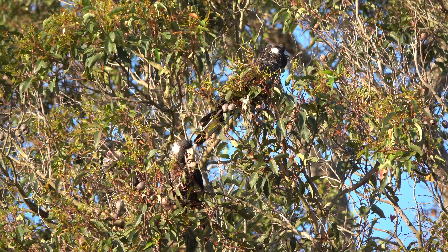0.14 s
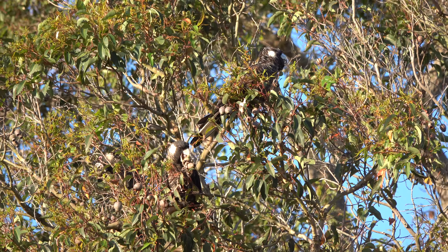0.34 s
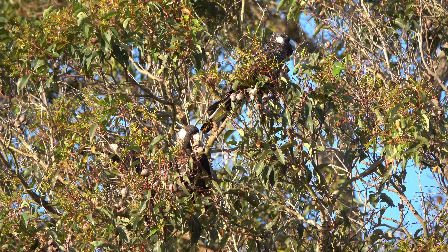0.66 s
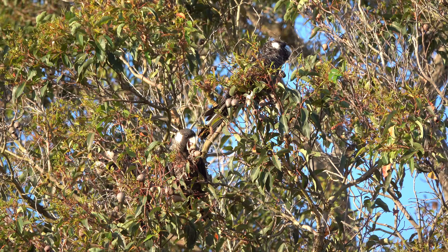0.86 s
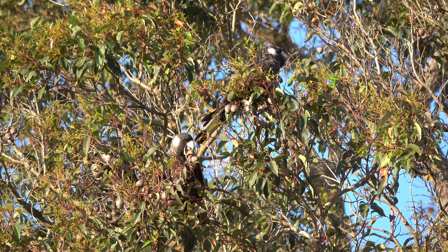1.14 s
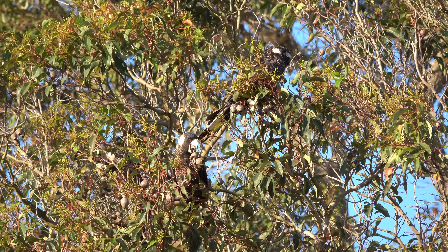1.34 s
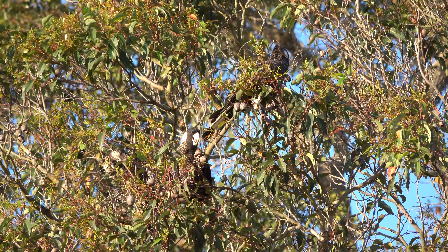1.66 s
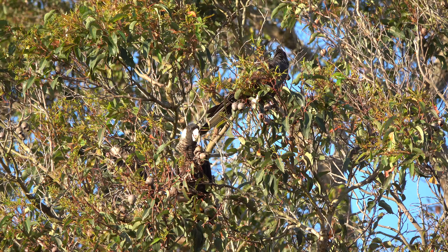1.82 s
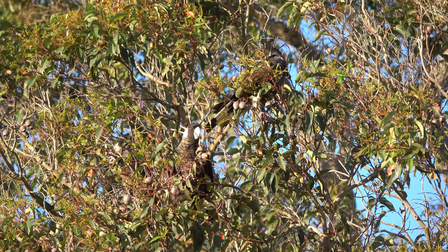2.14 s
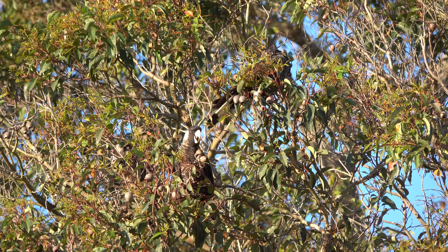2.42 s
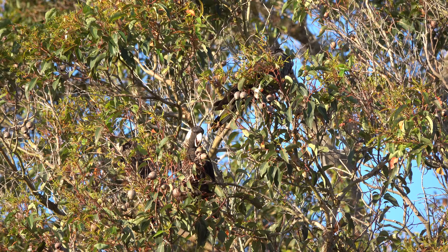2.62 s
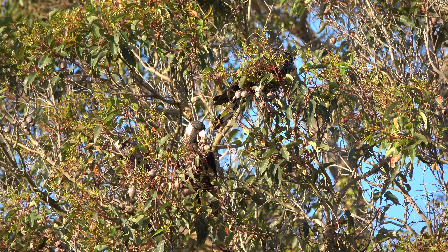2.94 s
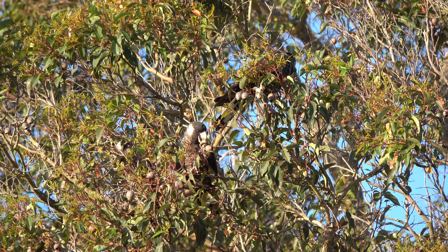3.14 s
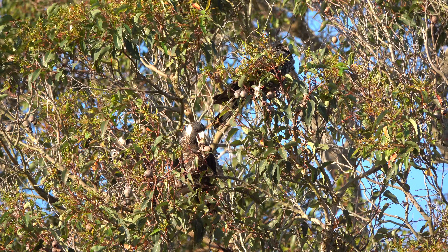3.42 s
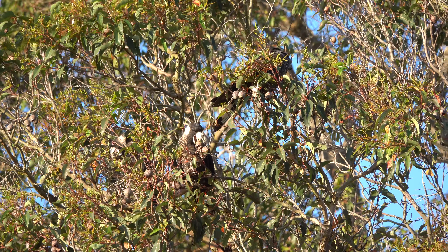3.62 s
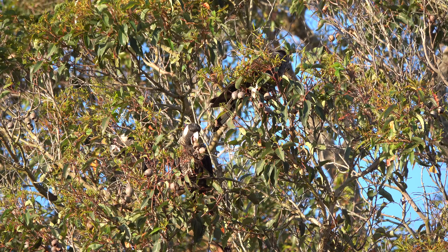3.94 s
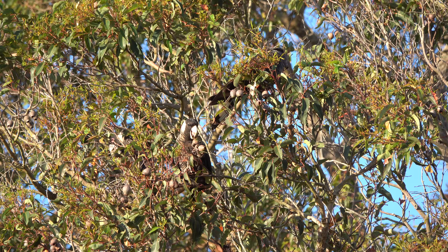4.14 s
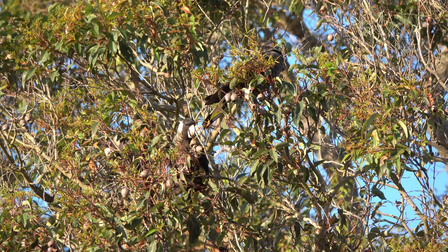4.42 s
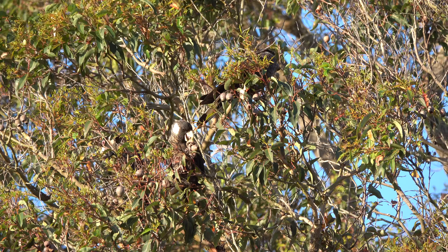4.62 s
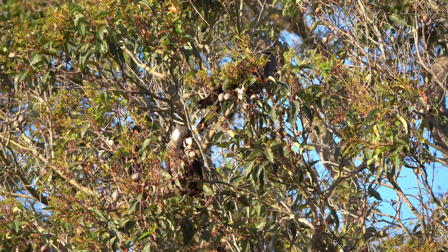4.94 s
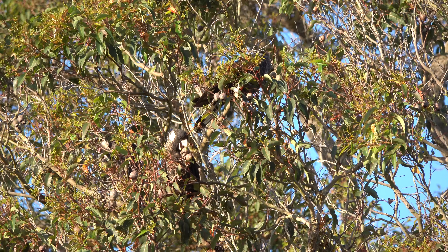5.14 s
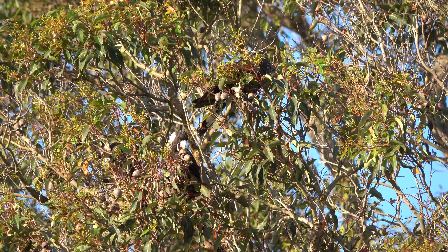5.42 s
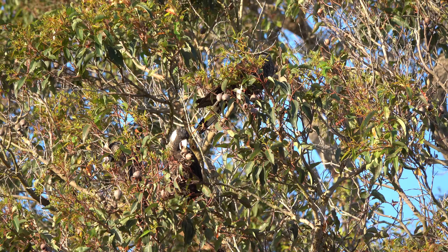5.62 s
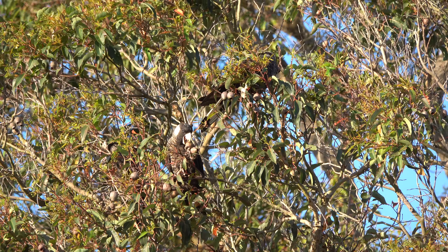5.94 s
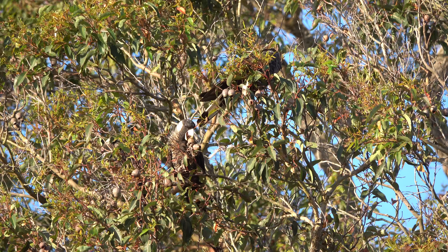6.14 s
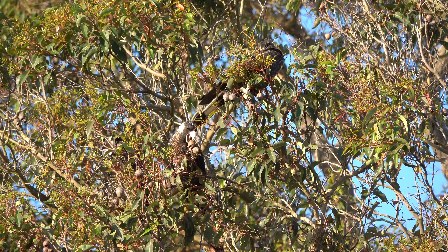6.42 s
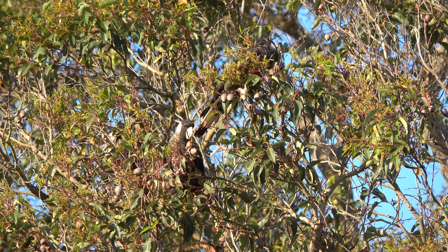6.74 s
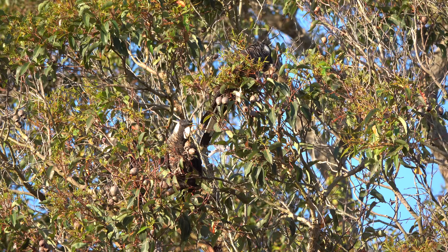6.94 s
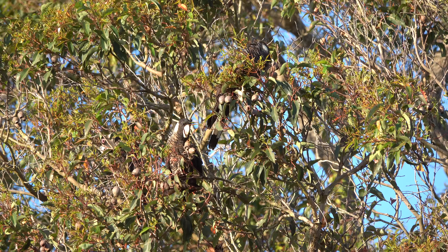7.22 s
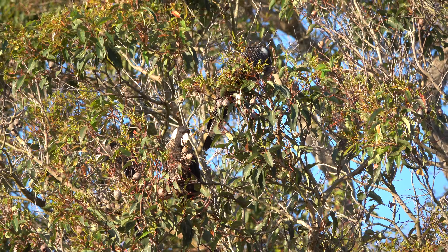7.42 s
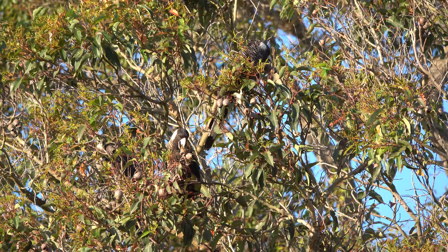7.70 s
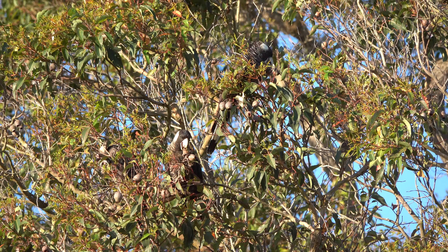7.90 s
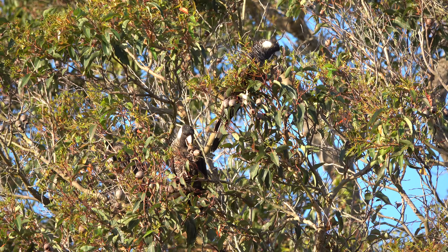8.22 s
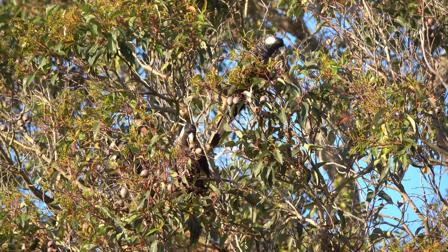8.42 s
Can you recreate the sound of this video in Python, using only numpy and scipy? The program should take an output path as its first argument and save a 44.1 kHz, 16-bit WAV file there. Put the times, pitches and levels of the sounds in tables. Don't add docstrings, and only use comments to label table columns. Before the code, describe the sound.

Short clusters of squealing, wailing cockatoo calls ring through open trees, separated by quiet gaps of faint hiss and low traffic wash.

```python
import sys
import numpy as np
from scipy import signal
from scipy.io import wavfile

SR = 44100
rng = np.random.default_rng(int(sys.argv[2]) if len(sys.argv) > 2 else 0)


def ratio_of_db(decibels):
    return 10 ** (np.asarray(decibels, float) / 20)


def unload_wav(signal):
    wavfile.write(
        sys.argv[1],
        SR,
        np.round(np.clip(np.atleast_2d(signal).T, -1, 1) * 32767).astype(np.int16),
    )


N = 377937


def rms_one(x):
    return x / np.sqrt(np.mean(x ** 2) + 1e-20)


def at_hz(points, hz):
    table_hz, value = np.array(points).T
    return np.interp(np.log(hz), np.log(table_hz), value)


def drift(rate_hz, size):
    knots = rng.standard_normal(int(size * rate_hz / SR * 2) + 3)
    return np.interp(np.arange(size) * rate_hz * 2 / SR, np.arange(len(knots)), knots) * 1.57


def pan(x, left_right_db):
    return np.array([x * ratio_of_db(left_right_db / 2), x * ratio_of_db(-left_right_db / 2)])


def voice(notes, partials_db, waver, shimmer_db, edge_s):
    # (frequency [Hz], level [dB])
    throat_colour = [(5800, 7.5), (7200, 1.5), (9200, 1.5), (11000, 1), (13500, -12), (16000, -5)]
    out = np.zeros(N)
    for note in notes:
        s, hz, level_db, *second_db = np.transpose(note)
        i = np.arange(int(s[0] * SR), min(int(s[-1] * SR), N))
        t = i / SR
        pitch_hz = np.interp(t, s, hz)
        phase = np.cumsum(pitch_hz * (1 + waver * drift(162.3, len(i)))) * 2 * np.pi / SR
        first = np.interp(t, s, level_db)
        if second_db:
            second = np.interp(t, s, second_db[0])
            levels = [first, second] + [second + db for db in partials_db]
        else:
            levels = [first + db for db in partials_db]
        edge = np.clip(np.minimum(t - s[0], s[-1] - t) / edge_s, 0, 1)
        for k, level in enumerate(levels, 1):
            if k > 1 + len(second_db):
                level = level + at_hz(throat_colour, k * pitch_hz)
            if k * hz.max() < 0.45 * SR:
                gain = ratio_of_db(level + shimmer_db * drift(50, len(i)))
                out[i] += np.sqrt(2) * edge * gain * np.sin(k * phase)
    return out


def glides(rows, attack, swell_db, release, fade_db, second_db=None, fall_bend=1.4):
    age = np.linspace(0, 1, num=12)
    swell = -swell_db * np.clip(1 - age / attack, 0, 1)
    fade = -fade_db * np.clip(1 - (1 - age) / release, 0, 1)
    notes = []
    for s, length_s, start_hz, end_hz, level_db in rows:
        bend = 0.65 if end_hz > start_hz else fall_bend
        hz = start_hz + (end_hz - start_hz) * age ** bend
        columns = [s + length_s * age, hz, level_db + (swell + fade)]
        if second_db is not None:
            columns.append(columns[2] + second_db)
        notes.append(np.transpose(columns))
    return notes


def wails():
    # (time [s], pitch [Hz])
    held_pitch = [
        [(1.085, 2560), (1.12, 2670), (1.17, 2725), (1.195, 2770), (1.24, 2772), (1.27, 2755), (1.3, 2705),
         (1.36, 2605), (1.392, 2520)],
        [(2.856, 2890), (2.873, 2850), (2.899, 2745), (2.925, 2695), (2.951, 2655), (2.977, 2520),
         (2.992, 2450)],
        [(3.688, 3090), (3.698, 3010), (3.705, 2950), (3.722, 2902), (3.758, 2880), (3.77, 2830), (3.802, 2680),
         (3.834, 2505), (3.849, 2430)],
    ]
    # (level [dB], second partial [dB])
    effort = [
        [(-57.5, -59), (-43, -43), (-37.5, -40.5), (-27.5, -44), (-32, -64), (-33.5, -39.5), (-37, -39.5),
         (-34.5, -40.5), (-32, -52)],
        [(-37, -50), (-32, -50.5), (-27, -42), (-33, -39.5), (-29, -36), (-30, -42), (-28, -43)],
        [(-34, -33), (-33, -38.5), (-24, -34), (-27.5, -29.5), (-25.5, -39.5), (-26, -44), (-29.5, -39),
         (-28, -45.5), (-30, -47)],
    ]
    # (time [s], length [s], start [Hz], end [Hz], level [dB])
    far_wails = [
        (7.385, 0.08, 2260, 2298, -46.5),
        (8.173, 0.05, 2730, 2444, -55),
        (8.506, 0.0623, 2997, 2905, -45),
    ]
    upper_db = [-18.5, -19.5, -17, -27.5]
    notes = [np.hstack([pitch, push]) for pitch, push in zip(held_pitch, effort)]
    notes += glides(far_wails, 0.22, 5.3, 0.55, 4, second_db=-16.5)
    return pan(voice(notes, upper_db, waver=0.0011, shimmer_db=2.5, edge_s=0.00095), -0.74)


def wail_drops():
    # (time [s], length [s], start [Hz], end [Hz], level [dB])
    drops = [
        (1.393, 0.072, 1970, 1798, -39),
        (2.993, 0.036, 2080, 1883, -29.5),
        (3.851, 0.03, 2120, 1890, -28.5),
    ]
    upper_db = [-10.5, -20, -21.5, -28]
    notes = glides(drops, 0.14, 2.2, 0.92, 4.4, second_db=-5, fall_bend=0.86)
    return pan(voice(notes, upper_db, waver=0.0037, shimmer_db=3.5, edge_s=0.00092), -0.8)


def lead_ins():
    # (time [s], length [s], start [Hz], end [Hz], level [dB])
    leads = [
        (2.785, 0.071, 3867, 3235, -31.5),
        (8.447, 0.0584, 4230, 3850, -45.5),
    ]
    upper_db = [-5, -14]
    notes = glides(leads, 0.32, 9.5, 0.54, 1.9, second_db=-28.5, fall_bend=1.1)
    return pan(voice(notes, upper_db, waver=0.0018, shimmer_db=2.5, edge_s=0.0026), -1.2)


def grunts():
    open_rows = [
        (7.075, 0.058, 799, 765, -73.5),
        (7.5, 0.057, 888, 797, -62),
        (7.63, 0.098, 807, 748, -74.5),
        (8.185, 0.025, 650, 604, -77),
    ]
    open_db = [13, 10.5, 6, 1, -4.5, -4.5, -17, -24, -39, -35]
    nasal_rows = [
        (0.0, 0.1, 753.5, 711, -61.5),
        (7.436, 0.054, 850, 803, -66),
    ]
    nasal_db = [-14, 9, 10, -8, 2, 3, -3, -6, -12, -18, -20, -20, -12]
    pinched_rows = [
        (6.543, .018, 764, 770, -60),
        (8.188, 0.026, 642, 632, -68.5),
    ]
    pinched_db = [-18, -7, -1.5, 7.5, -3, -1, 3, 1, -12, -19]
    pinched = glides(pinched_rows, 0.22, 3.0, 0.61, 9.3)
    out = pan(voice(pinched, pinched_db, waver=0.003, shimmer_db=-1.0, edge_s=0.0018), -0.91)
    opened = glides(open_rows, 0.38, 7.5, 0.74, 7.2)
    out += pan(voice(opened, open_db, waver=0.011, shimmer_db=3.5, edge_s=0.0019), 0.058)
    nasal = glides(nasal_rows, 0.1, 0.3, 1.0, 11.0)
    out += pan(voice(nasal, nasal_db, waver=0.0025, shimmer_db=2.5, edge_s=0.00071), -1.0)
    return out


def warble():
    # (time [s], pitch [Hz], level [dB])
    zigzags = [
        [(.805, 4450, -57), (.83, 4590, -42), (.842, 4320, -46), (.848, 3645, -36.5), (.882, 3900, -43.5)],
        [(.888, 4570, -35.5), (.908, 4564, -46), (.917, 4190, -36), (.925, 4690, -34.5), (.937, 3720, -39)],
        [(6.42, 3990, -46), (6.433, 3990, -40), (6.44, 4570, -44), (6.447, 4010, -46), (6.455, 4200, -30)],
        [(6.455, 4070, -40), (6.463, 4980, -36), (6.472, 4130, -34), (6.495, 4520, -35), (6.503, 5150, -47),
         (6.515, 5090, -35.5), (6.532, 4900, -38.5), (6.543, 4060, -24.5)],
    ]
    partials_db = [0, -25]
    return pan(voice(zigzags, partials_db, waver=0.004, shimmer_db=3.0, edge_s=0.004), -7)


def small_parrots():
    twitter_rows = [ (.13, 0.035, 4720, 4750, -51.5), (.17, 0.027, 4400, 4100, -49),
                    (.28, 0.059, 4200, 4080, -46), (.325, 0.072, 4860, 4440, -51.5),
                    (.5, 0.028, 5520, 4350, -53), (.2, .03, 4800, 4140, -66),
                    (.245, 0.011, 5500, 5360, -65), (.375, 0.05, 4630, 4300, -49),
                    (2.55, .04, 4150, 4130, -65), (2.642, 0.036, 4150, 4250, -41),
                    (2.685, 0.014, 4250, 4170, -52), (2.712, 0.032, 4230, 4230, -57),
                    (3.08, 0.034, 5210, 5230, -46.5), (3.113, 0.02, 4210, 4090, -40),
                    (4.86, 0.06, 5280, 5160, -76), (5.65, 0.077, 3860, 4050, -61.5),
                    (5.745, 0.036, 4180, 4120, -52), (5.84, 0.103, 3920, 4040, -57),
                    (5.903, 0.091, 4600, 4550, -53), (6.115, 0.07, 4760, 4750, -54),
                    (6.165, 0.017, 4840, 4745, -44), (6.185, 0.052, 4650, 4700, -57),
                    (6.25, 0.062, 4870, 4600, -65), (6.35, 0.09, 3930, 4190, -49),
                    (6.415, 0.045, 4650, 4776, -47), (7.895, 0.033, 4220, 3940, -67.5), ]
    twitter_db = [0, -30]
    halved_rows = [
        (.89, 0.013, 2250, 2300, -59),
    ]
    halved_db = [0, -18.5, 2.4]
    twitter = glides(twitter_rows, 0.59, 3.2, 0.24, 2.8, fall_bend=0.86)
    out = pan(voice(twitter, twitter_db, waver=0.0089, shimmer_db=4.5, edge_s=0.0016), -8.5)
    halved = glides(halved_rows, 0.2, 3.0, 0.4, 3.3)
    out += pan(voice(halved, halved_db, waver=0.0045, shimmer_db=8.0, edge_s=0.0033), -10)
    return out


def squeals():
    # (time [s], length [s], start [Hz], end [Hz], level [dB])
    rows = [ (.13, 0.056, 3080, 3440, -53), (.21, 0.23, 3240, 3425, -49), (.195, 0.012, 3100, 2800, -54),
            (.443, 0.032, 3013, 2740, -49), (.51, .035, 1850, 1840, -60), (.27, 0.016, 1920, 1740, -57),
            (.933, .011, 2950, 2930, -45), (1.65, 0.42, 3640, 3674, -74), (2.26, .03, 2550, 2930, -77),
            (5.76, 0.043, 3300, 3050, -66), (5.975, 0.035, 3360, 3280, -64), (6.455, .04, 3220, 3340, -64),
            (6.355, 0.044, 2340, 2060, -58), (3.14, 0.057, 3416, 2970, -40.5),
            (3.506, 0.013, 2840, 3010, -35), (3.59, 0.12, 4010, 3550, -48), (3.53, 0.043, 2980, 2620, -53),
            (5.71, 0.06, 4630, 4680, -51), (5.835, 0.075, 2980, 2530, -57.5),
            (5.92, 0.042, 3400, 3140, -60), (6.08, 0.054, 2880, 2620, -53.5), (6.17, 0.1, 3140, 3150, -59),
            (6.265, 0.057, 3190, 3234, -54), (7.287, 0.025, 2010, 2900, -58),
            (7.296, 0.019, 1600, 2050, -58), (7.315, .04, 3620, 3550, -68),
            (8.405, 0.064, 2970, 3330, -53.5), ]
    partials_db = [0, -33, -32]
    notes = glides(rows, 0.43, 3.1, 0.33, 3.0, fall_bend=0.86)
    return pan(voice(notes, partials_db, waver=0.008, shimmer_db=3.5, edge_s=0.006), -3)


def curved_calls():
    # (time [s], pitch [Hz], level [dB], second partial [dB])
    arcs = [
        [(3.442, 1530, -38, -49), (3.455, 1635, -38, -43), (3.47, 1762, -38.5, -41.5), (3.49, 1850, -42, -40.5),
         (3.505, 1960, -48, -49.5), (3.545, 1880, -55, -72)],
        [(3.6, 2640, -70, -63), (3.63, 2640, -71, -62), (3.655, 2650, -72, -51), (3.68, 2340, -69, -44)],
        [(.375, 3820, -52, -75), (.41, 3610, -54, -63), (.435, 3870, -49, -62), (.452, 4080, -46, -61),
         (.47, 3800, -46, -67), (.492, 3460, -52, -59)],
        [(7.435, 1780, -53, -48), (7.46, 1678, -40, -48), (7.49, 1462, -49.5, -48.5), (7.52, 1317, -52, -54),
         (7.56, 1190, -66, -56)],
        [(7.345, 2500, -56, -85), (7.362, 2830, -62, -85), (7.378, 3050, -60, -85), (7.41, 2780, -71, -85)],
    ]
    dip = [
        [(2.515, 3050, -60, -99), (2.54, 3400, -56, -99), (2.575, 3490, -62.5, -99), (2.588, 3280, -52, -82),
         (2.608, 3040, -55, -82), (2.64, 3035, -51, -70.5), (2.672, 3190, -54, -77), (2.69, 3310, -59, -86),
         (2.75, 3620, -55, -92)],
    ]
    arc_upper_db = [-21.5, -27.5, -31.5, -30.5]
    dip_upper_db = [12]
    calls = voice(arcs, arc_upper_db, waver=0.007, shimmer_db=4.0, edge_s=0.005)
    calls += voice(dip, dip_upper_db, waver=0.0034, shimmer_db=2.0, edge_s=0.0048)
    return pan(calls, -2.2)


def answers():
    # (time [s], length [s], start [Hz], end [Hz], level [dB])
    rows = [
        (.285, 0.017, 5650, 5470, -46),
        (2.68, 0.058, 2480, 2690, -64),
        (5.8, 0.065, 1790, 1500, -62),
        (5.872, 0.035, 2400, 2130, -58.5),
        (5.905, 0.046, 1904, 1680, -58),
        (6.125, 0.05, 2350, 1765, -57),
        (3.424, 0.024, 1700, 2005, -38),
        (7.31, 0.07, 1156, 1350, -54),
    ]
    upper_db = [-22.5, -31, -41, -36]
    notes = glides(rows, 0.35, 1.5, 0.25, 6.4, second_db=-19.5, fall_bend=0.86)
    return pan(voice(notes, upper_db, waver=0.008, shimmer_db=3.0, edge_s=0.005), -1.5)


def rasps_and_rustles():
    # (time [s], fall [s], level [dB],
    # brightness [dB per octave], left-right [dB])
    rows = [(.11, 0.58, -57, -3.5, -3), (.81, .2, -79.5, 18, -11), (.89, 0.043, -71, 18, 1),
            (3.42, 0.062, -75, 18.5, 1.5), (5.645, 0.05, -75, 0, -1), (1.75, 0.0463, -69, 5, -3),
            (1.9, 0.025, -99.5, 31, 1.5), (2.51, 0.45, -88, 19.5, -6), (3.11, 0.32, -48, -0.5, -2),
            (3.408, 0.53, -63, -35, 0.5), (5.051, 0.0048, -65.5, 11, 4), (5.68, 0.3, -73, 3, -1),
            (5.88, 0.12, -66.5, -15, 5), (6.08, 0.58, -64.5, -7, -1.5), (6.25, 0.078, -64.5, 13.5, -6),
            (6.42, 0.43, -68, 6, -2), (7.068, 0.15, -67.5, -1.5, -1), (7.46, 0.18, -65, -23, 2),
            (8.178, .11, -66, 2, -4.5)]
    # (frequency [Hz], width [Hz], level [dB])
    resonances = [(2625, 1380, -1.5), (3180, 550, 5), (4714, 1410, 5), (5540, 2200, -10.5),
                  (9200, 650, -14), (11860, 3500, -29)]
    t = np.arange(N) / SR
    pulses = rng.standard_normal(N) * ratio_of_db(1.5 * drift(300, N))
    out = np.zeros((2, N))
    for hz, width_hz, throat_db in resonances:
        r = np.exp(-np.pi * width_hz / SR)
        b, a = [1, 0, -1], [1, -2 * r * np.cos(2 * np.pi * hz / SR), r * r]
        ringing = rms_one(signal.lfilter(b, a, signal.lfilter(b, a, pulses)))
        for s, fall_s, level_db, bright_db, side_db in rows:
            rise_s = 0.14 * fall_s
            i = slice(int(s * SR), int((s + rise_s + 2 * fall_s) * SR))
            age = t[i] - s
            shape = np.clip(age / rise_s, 0, 1) * ratio_of_db(-20 * np.maximum(age - rise_s, 0) / fall_s)
            gain = ratio_of_db(level_db + throat_db + bright_db * np.log2(hz / 3500))
            out[:, i] += pan(ringing[i] * shape * gain, side_db)
    return out


def flock(bouts, spread, turns_per_s, count):
    out = np.zeros(N)
    for bout in bouts:
        s, hz, level_db = np.transpose(bout)
        i = np.arange(int(s[0] * SR), int(s[-1] * SR))
        t = i / SR
        edge = np.clip(np.minimum(t - s[0], s[-1] - t) * 50, 0, 1)
        gain = ratio_of_db(np.interp(t, s, level_db) - 2.0)
        for _ in range(count):
            pitch_hz = np.interp(t, s, hz) * (1 + spread * np.tanh(drift(turns_per_s, len(i))))
            pitch_hz *= 1 + 0.014 * drift(220, len(i))
            phase = np.cumsum(pitch_hz) * 2 * np.pi / SR
            gate = np.clip(drift(24.53, len(i)) + 0.67, 0, 1) * edge
            out[i] += gate * gain * (np.sin(phase) + ratio_of_db(-25.5) * np.sin(2 * phase))
    return out


def far_flocks():
    # (time [s], length [s], start mean pitch [Hz], end mean pitch [Hz], level [dB])
    chatter_rows = [
        (.08, 0.25, 4420, 4680, -50),
        (.275, 0.19, 4435, 4330, -44),
        (5.69, 0.58, 4390, 4410, -53),
        (6.134, 0.17, 4400, 4460, -51.5),
    ]
    mutter_rows = [
        (.18, 0.48, 2880, 2980, -55.5),
        (3.1, 0.16, 2900, 2920, -69),
        (5.9, .35, 2990, 3000, -58.5),
    ]
    chatter = glides(chatter_rows, 0.17, 2.5, 0.56, 9.7)
    mutter = glides(mutter_rows, 0.19, 2, 0.17, 3.3)
    out = pan(flock(chatter, spread=0.08, turns_per_s=45.0, count=4), -0.59)
    return out + pan(flock(mutter, spread=0.28, turns_per_s=13, count=3), 0.65)


def bands():
    edges = 25 * 2 ** np.arange(0, 9.5, 1 / 3)
    return [(np.sqrt(a * b), signal.butter(2, [a, b], "band", fs=SR, output="sos"))
            for a, b in zip(edges, edges[1:])]


def woodland(x):
    # (frequency [Hz], T60 [s])
    tail_t60 = [(1400, 1.18), (2800, 1.256), (4000, 1.33), (5500, 1.047), (8000, 1.26), (12000, 0.74)]
    scatter = rng.standard_normal((3, int(1.3 * SR)))
    t = np.arange(scatter.shape[1]) / SR
    white = rms_one(scatter[:2] + 0.55 * scatter[2])
    late = 0
    for hz, sos in bands():
        if hz > 500:
            late = late + signal.sosfilt(sos, white) * ratio_of_db(-60 * t / at_hz(tail_t60, hz))
    late = late * np.clip(t / 0.16, 0, 1)
    early = signal.lfilter(*signal.butter(1, 13500, fs=SR), white)
    early = early * ratio_of_db(-60 * t / 0.43) * np.clip(t / 0.0041, 0, 1)
    echo = ratio_of_db(10.5) * late + ratio_of_db(14.5) * early
    return signal.fftconvolve(x, echo / np.sqrt(SR), axes=1)[:, :N]


def banded_noise(spectrum, patchy, side_db):
    # (frequency [Hz], left-right likeness [0-1])
    likeness = [(40, 0.85), (150, 0.87), (300, 1), (600, 0.7), (1200, 0.78), (2500, 0.32), (6000, 0.41),
                (14000, 0.57)]
    # (frequency [Hz], share of left-right difference [0-1])
    side_share = [(60, 0.55), (200, 0.51), (400, 1)]
    out, white = 0, rng.standard_normal((2, 2, N))
    for k, (hz, sos) in enumerate(bands()):
        if spectrum[0][0] < hz < spectrum[-1][0]:
            mid, side = signal.sosfilt(sos, white[k % 2])
            alike = np.clip(at_hz(likeness, hz), 0, 1)
            gain = pan(ratio_of_db(at_hz(spectrum, [hz])), side_db * at_hz(side_share, hz))
            gain = gain * (1 + patchy * drift(3.3, N))
            out = out + gain * (np.sqrt(1 + alike) * mid + np.sqrt(1 - alike) * side * [[1], [-1]])
    return rms_one(out)


def road():
    # (time [s], level [dB])
    roar_level = [(0.0, -49), (0.33, -49.5), (0.81, -54), (1.001, -51.5), (1.19, -50), (1.84, -53.5),
                  (2.359, -51.5), (3.03, -54), (3.7, -54.5), (4.25, -53), (4.75, -55), (5.11, -54),
                  (5.658, -55.5), (7.54, -54), (7.81, -57), (8.57, -55.5)]
    # (frequency [Hz], density [dB per Hz])
    roar_colour = [(18, -72), (30, -38.5), (151, -29), (334, -8.5), (517, -10), (583, -1.5), (657, -4.5),
                   (834, 2), (1550, -4.5), (2450, -22), (3500, -19), (4550, -58), (7700, -120)]
    # (time [s], length [s], start [Hz], end [Hz], level [dB])
    hums = [
        (.2, 0.87, 142, 146, -87.5),
        (2.22, 0.91, 1763, 1720, -65.5),
        (3.92, 0.235, 93.5, 84, -83),
    ]
    # (time [s], pitch [Hz], level [dB])
    engine = [
        [(4.3, 50, -104), (4.49, 56.4, -90), (4.91, 61.5, -76.5), (5.5, 64.8, -83), (5.64, 66, -89.5),
         (7.3, 66.5, -88.5), (8.11, 66.6, -84), (8.57, 67.6, -84)],
    ]
    s, level_db = np.transpose(roar_level)
    roar = banded_noise(roar_colour, patchy=0.1, side_db=-2.5)
    roar = roar * ratio_of_db(np.interp(np.arange(N) / SR, s, level_db) + 1.5)
    tones = glides(hums, 0.13, 4.7, 0.14, 6) + engine
    return roar + voice(tones, [0], waver=0.0048, shimmer_db=2.0, edge_s=0.047)


def microphone_hiss():
    # (frequency [Hz], density [dB per Hz])
    colour = [(1470, -21), (2500, 3), (2870, -7.5), (5840, -4), (7190, -8.5), (13900, -13.5), (15600, -11)]
    return ratio_of_db(-70) * banded_noise(colour, patchy=0.04, side_db=-3.5)


def scene():
    near = wails() + wail_drops() + lead_ins() + grunts()
    warbler = warble()
    parrots = small_parrots()
    middle = squeals() + curved_calls() + answers()
    far = rasps_and_rustles() + far_flocks()
    sent = near + ratio_of_db(-3) * parrots + ratio_of_db(-1) * middle + ratio_of_db(3) * far + ratio_of_db(-8) * warbler
    direct = near + parrots + warbler + middle + ratio_of_db(1.0) * far
    return direct + woodland(sent) + road() + microphone_hiss()


def band_limit(x):
    return signal.sosfilt(signal.butter(12, 15710, fs=SR, output="sos"), x)


def record(dry):
    return band_limit(dry)


dry = scene()
out = record(dry)
unload_wav(out)
```